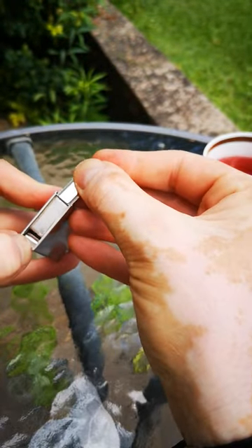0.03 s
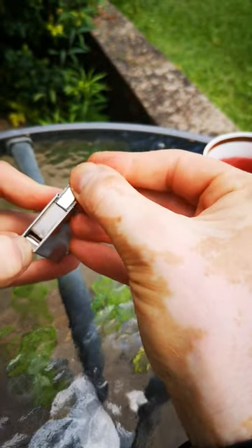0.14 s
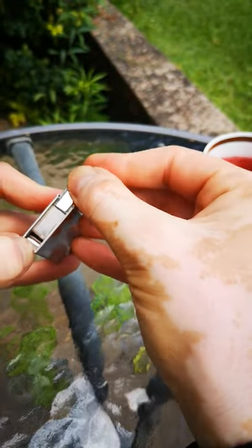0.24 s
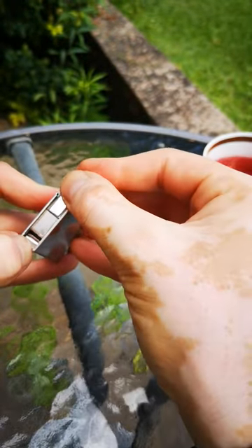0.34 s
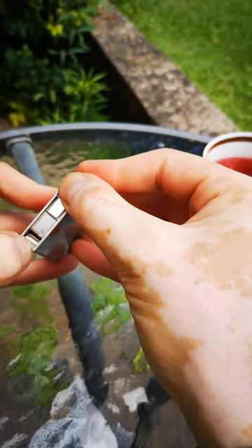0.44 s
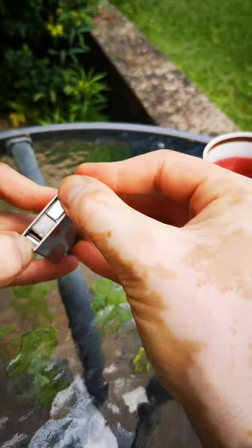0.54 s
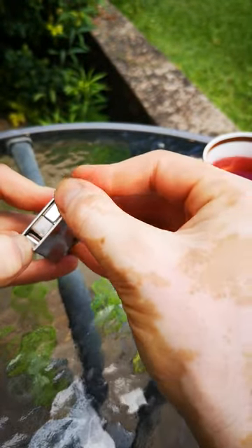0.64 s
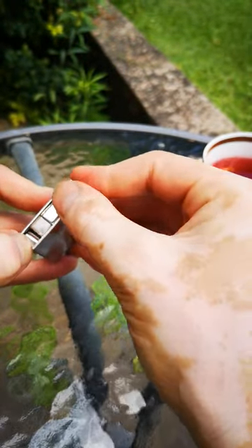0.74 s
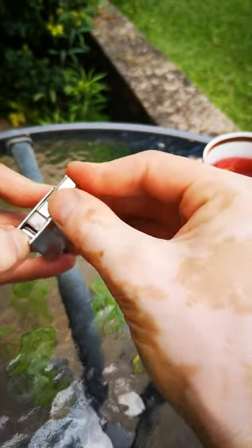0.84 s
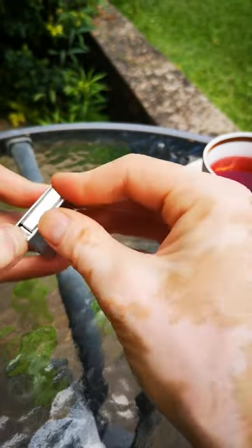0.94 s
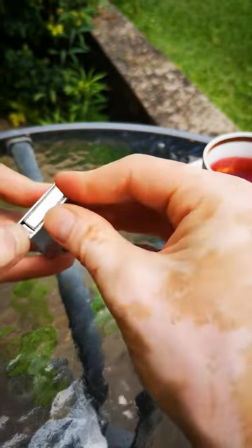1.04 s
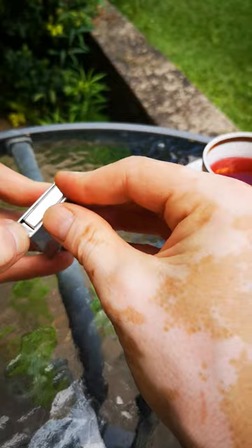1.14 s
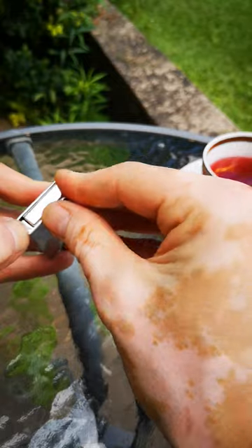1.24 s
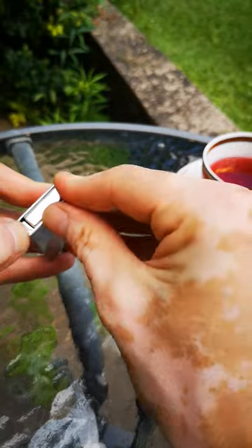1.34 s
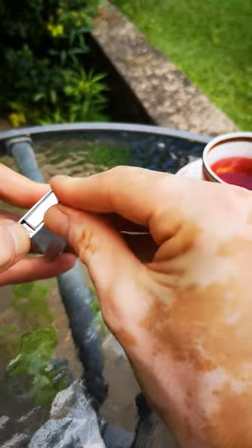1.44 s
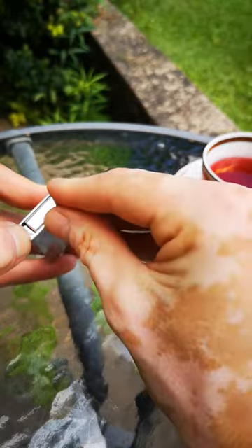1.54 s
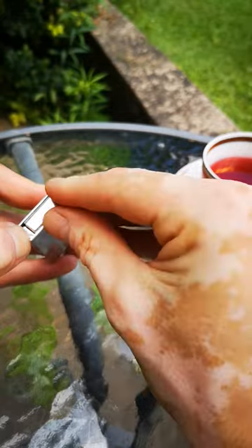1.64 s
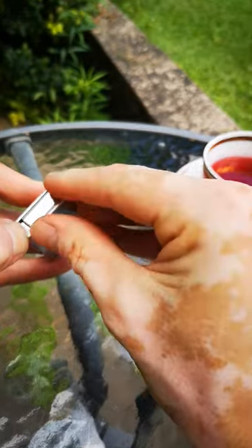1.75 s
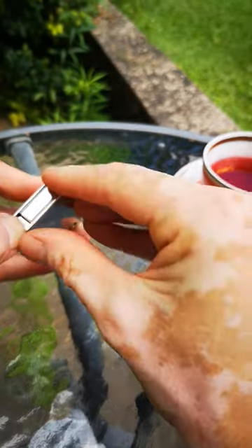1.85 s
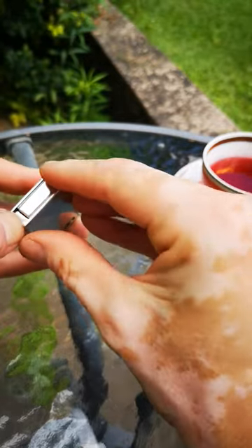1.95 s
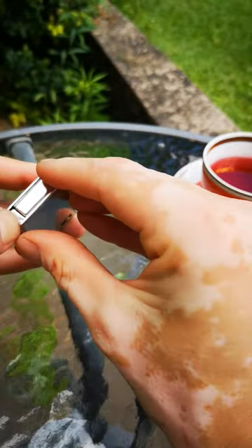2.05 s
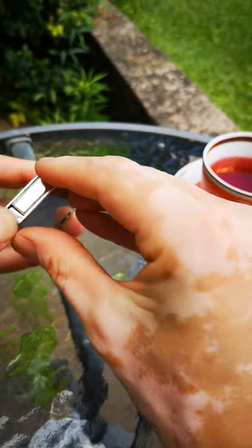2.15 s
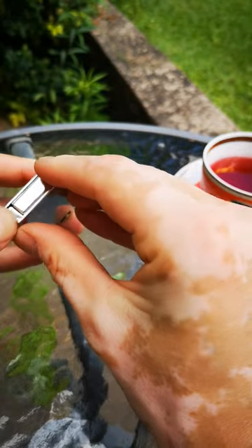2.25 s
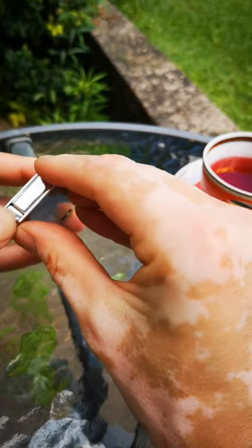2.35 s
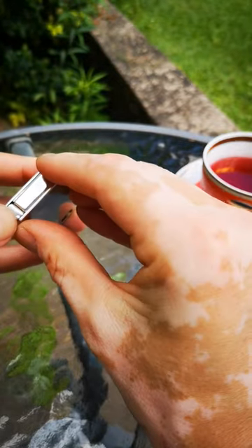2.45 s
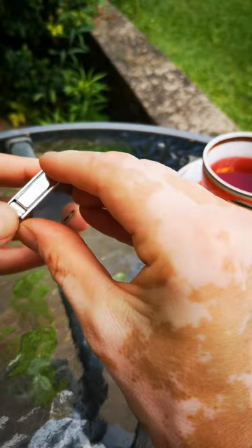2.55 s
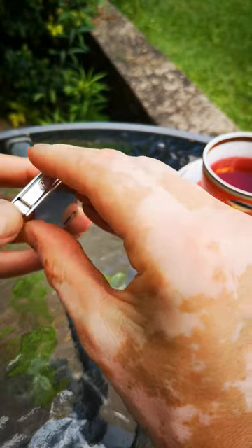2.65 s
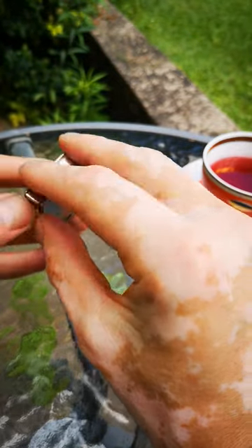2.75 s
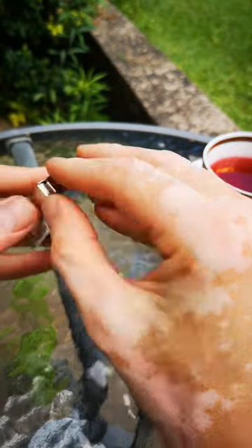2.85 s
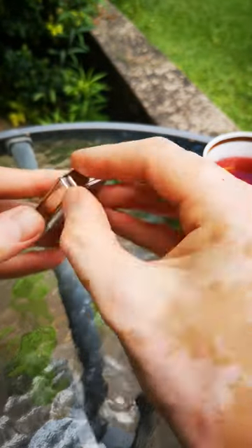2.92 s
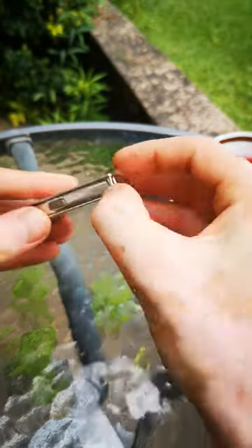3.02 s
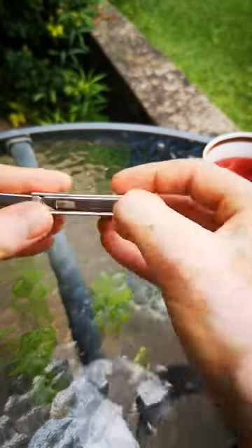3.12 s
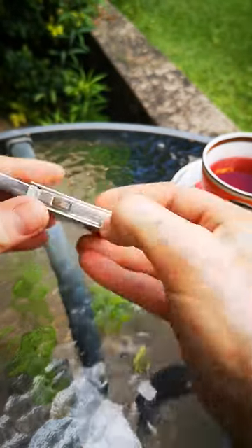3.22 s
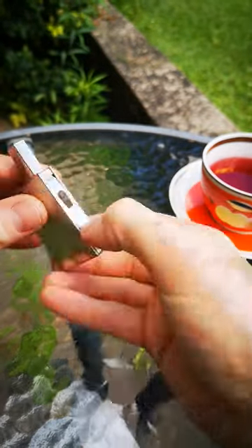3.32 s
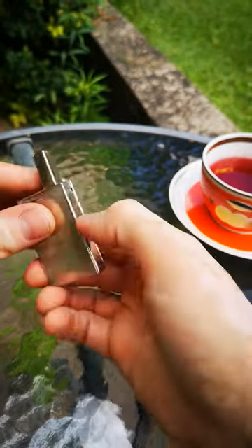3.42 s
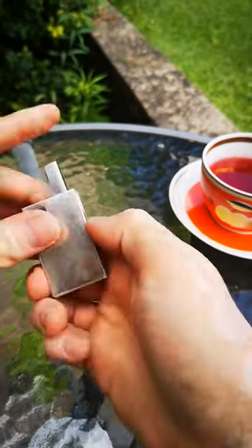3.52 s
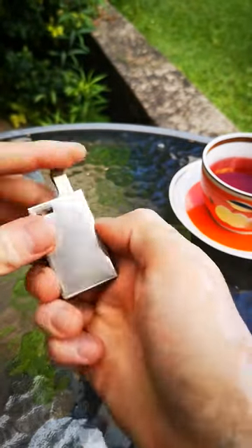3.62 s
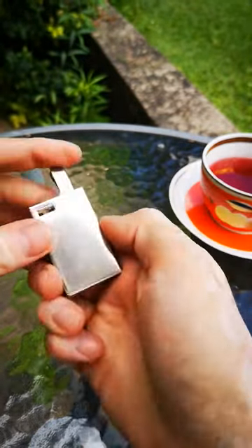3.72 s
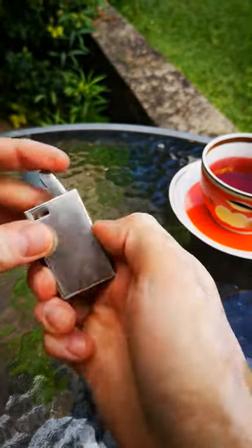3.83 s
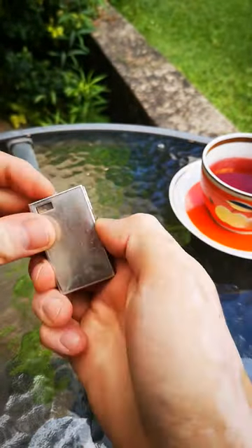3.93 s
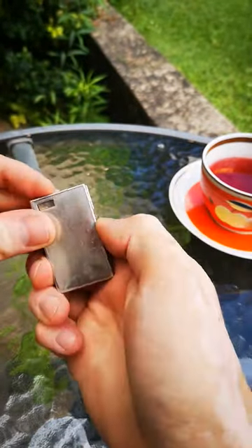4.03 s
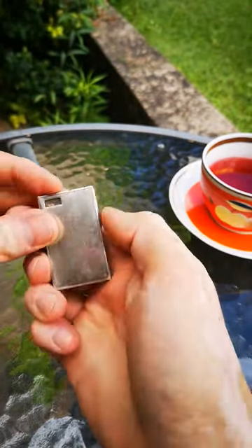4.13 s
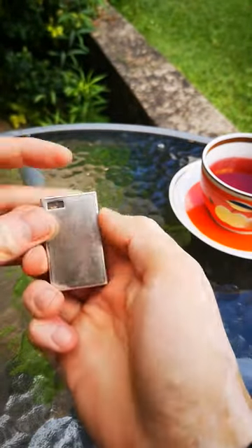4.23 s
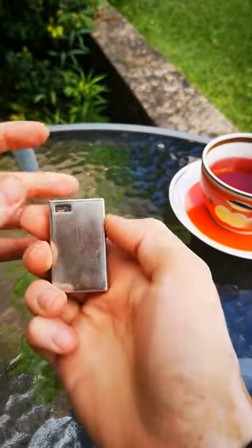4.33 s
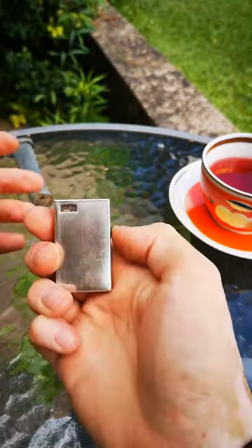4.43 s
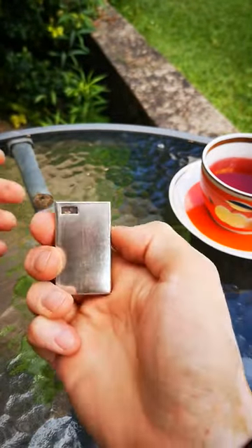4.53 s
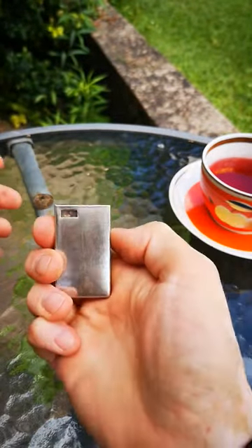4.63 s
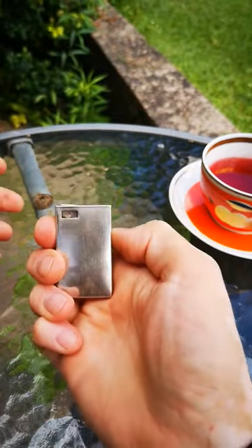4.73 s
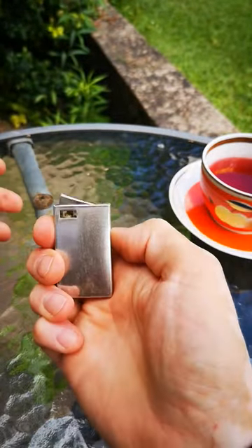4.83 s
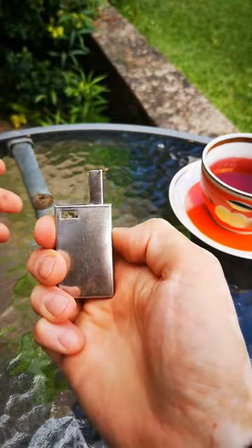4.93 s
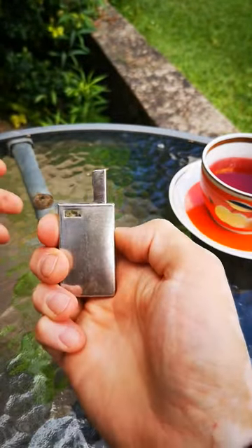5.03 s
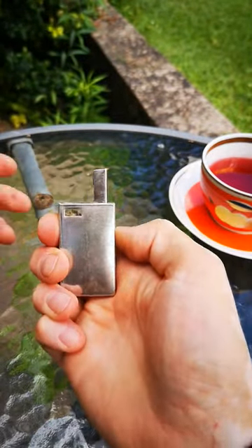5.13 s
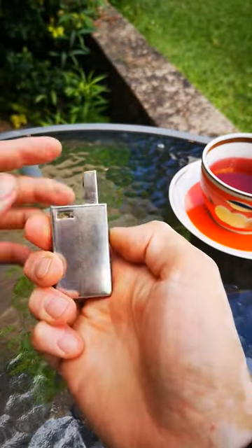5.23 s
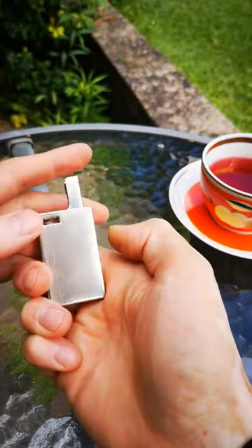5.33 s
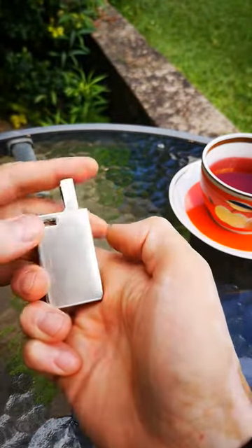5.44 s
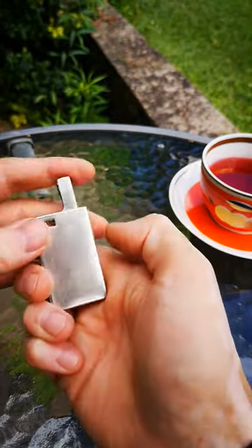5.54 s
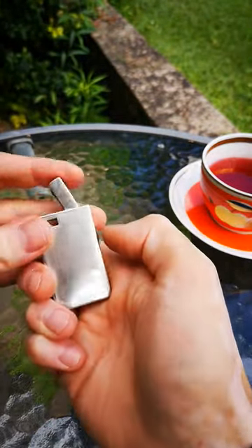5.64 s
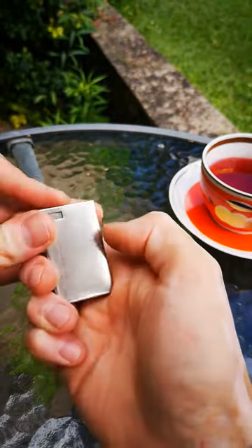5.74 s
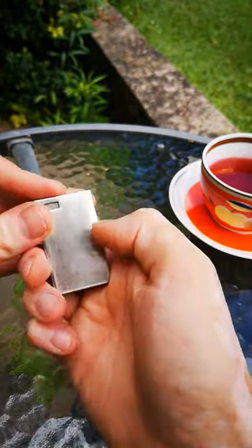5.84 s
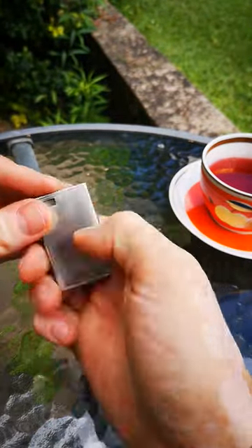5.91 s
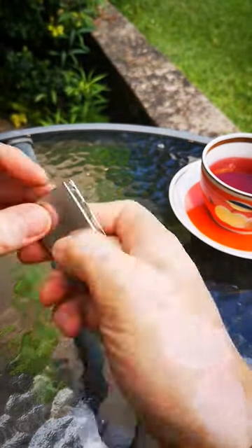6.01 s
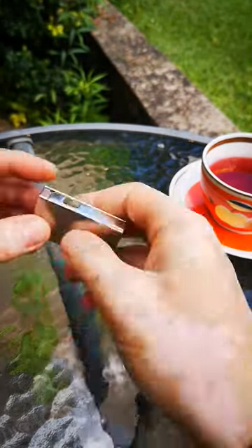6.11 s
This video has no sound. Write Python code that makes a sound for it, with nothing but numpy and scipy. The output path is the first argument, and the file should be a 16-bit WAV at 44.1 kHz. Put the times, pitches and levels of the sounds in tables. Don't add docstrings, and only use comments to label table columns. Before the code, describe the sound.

A quiet patio, heard close in stereo. Low, soft road rumble runs throughout, with a deep engine throb swelling and sinking irregularly and a faint drone later on. At 0.03 s a small metallic tick and brief scrape; a faint rub at 0.33. At 0.92 a sharp, bright snap of several contacts packed together, then a dull knock on ringing glass at 1.02 and a fainter touch at 1.13. Tiny finger ticks and a soft rub follow from 1.4 to 2.5. A far bird whistles upward around 3.2, with faint chips after. Light rattle at 3.35, a stronger scraping rattle at 3.54-3.59, then a hard snap at 3.88 and another click at 3.98, with a light glass touch. At 4.92 the loudest snap rings briefly. Small rattles at 5.26-5.43, a growing gritty push from 5.68 ending in a click at 5.76, and a soft glass tap at 6.14.

```python
import sys
import numpy as np
from scipy import signal
from scipy.fft import rfft, irfft, next_fast_len
from scipy.io import wavfile
from scipy.ndimage import uniform_filter1d, minimum_filter1d

SR = 44100
rng = np.random.default_rng(int(sys.argv[2]) if len(sys.argv) > 2 else 0)


def generate_wav(signal):
    frames = np.transpose(np.atleast_2d(signal))
    scaled = np.clip(frames, -1, 1) * 32767
    pcm = np.round(scaled).astype(np.int16)
    wavfile.write(sys.argv[1], SR, pcm)


def decibels_to_gain(level_db):
    exponent = np.asarray(level_db, float) / 20
    return 10 ** exponent


N = 272097


def rms_one(x):
    return x / np.sqrt(np.mean(x ** 2) + 1e-20)


def at_hz(points, hz):
    points = np.array(points)
    return np.interp(np.log(hz), np.log(points[:, 0]), points[:, 1])


def in_time(rows, outside=None):
    s, *columns = np.transpose(rows)
    t = np.arange(N) / SR
    return [np.interp(t, s, column, left=outside, right=outside) for column in columns]


def drift(rate):
    r = np.exp(-80 * np.pi * rate / SR)
    chance = rng.standard_normal(N // 40 + 2002)
    slow = signal.lfilter([1], [1, -2 * r, r * r], chance)[2000:]
    return np.interp(np.arange(N) / 40, np.arange(len(slow)), rms_one(slow))


def ring(clicks, hz, t60, phase=0):
    r = decibels_to_gain(-60 / (t60 * SR))
    w = 2 * np.pi * hz / SR
    start = [np.sin(phase), r * np.sin(w - phase)]
    return signal.lfilter(start, [1, -2 * r * np.cos(w), r * r], clicks + 1e-18)


def peak(x, hz, width_hz):
    r = np.exp(-np.pi * width_hz / SR)
    ends = np.array([1, 0, -1]) * (1 - r * r) / 2
    return signal.lfilter(ends, [1, -2 * r * np.cos(2 * np.pi * hz / SR), r * r], x)


def band(x, low_hz, high_hz):
    edges = [low_hz, min(high_hz, .45 * SR)]
    return signal.sosfilt(signal.butter(4, edges, "band", fs=SR, output="sos"), x)


def road_noise(white):
    # f/Hz, level per Hz/dB
    air = [(18, -8), (35, -3), (65, -8), (90, -15.5), (140, -22), (270, -24.5), (340, -33.5), (600, -37.5),
           (1050, -30), (1900, -39), (2900, -48), (4500, -55.5), (7500, -59), (15000, -73)]
    # f/Hz, likeness (1 = the same)
    likeness = [(60, 1), (130, 0.99), (290, 1), (600, 0.13), (1100, 0.067), (1800, 0.54), (3100, 0.031),
                (15000, .01)]
    # f/Hz, delay/ms
    late = [(60, 0.38), (350, 0.4), (700, 0.26), (1500, 0.53)]
    # t/s, level/dB
    road = [(0, -0.9), (1.1, -0.07), (1.5, -0.7), (1.9, -0.3), (2.6, -1.5), (3.2, 0.7), (3.8, 0.5),
            (4.5, 1), (4.9, 0.3), (5.25, 0.2), (5.65, 2.5), (6.17, -0.7)]
    out = 0
    edges = 18 * 2 ** (np.arange(30.5) / 3)
    together = drift(1.6)
    for k, (low, high) in enumerate(zip(edges, edges[1:])):
        third = signal.butter(2, [low, high], "band", fs=SR, output="sos")
        mid, side = signal.sosfilt(third, white[k % 2])[:, SR:]
        hz = np.sqrt(low * high)
        alike = np.clip(at_hz(likeness, hz), -1, 1)
        gain = decibels_to_gain(at_hz(air, hz) + .6 * together + .5 * drift(9))
        pair = np.sqrt(1 + alike) * mid + np.sqrt(1 - alike) * side * [[1], [-1]]
        pair[0] = np.roll(pair[0], round(at_hz(late, hz) * SR / 1000))
        out = out + gain * pair
    return decibels_to_gain(-48.0) * decibels_to_gain(in_time(road)[0]) * rms_one(out)


def engine_throb(white):
    # t/s, top level/dB, half length/s
    surges = [(0.0, -37, 0.057), (.22, -49, 0.028), (0.401, -37, 0.02), (0.588, -47.5, 0.039),
              (0.753, -44.5, 0.14), (1.001, -47.5, 0.22), (1.298, -40, 0.069), (1.479, -37.5, 0.032),
              (1.64, -39, 0.11), (1.872, -37, 0.045), (2.027, -38, .05), (2.313, -45, 0.21),
              (2.808, -34, 0.031), (3.02, -37.5, 0.054), (3.176, -43.5, 0.045), (3.419, -40.5, 0.089),
              (4.161, -43.5, 0.28), (4.418, -45, 0.076), (4.688, -40, 0.087), (4.856, -41.5, 0.034),
              (5.036, -47.5, .06), (5.288, -37.5, 0.053), (5.554, -35.5, 0.056), (5.897, -45.5, 0.12),
              (6.17, -38.5, 0.062)]
    t = np.arange(N) / SR
    surge = decibels_to_gain(-61.5) + sum(decibels_to_gain(db) * np.exp(-((t - s) / half) ** 2) for s, db, half in surges)
    throb = rms_one(peak(peak(white, 64, 4.9), 64, 4.9)[SR:])
    throb /= np.sqrt(uniform_filter1d(throb ** 2, size=SR // 8) + 0.29)
    return decibels_to_gain(-3.0) * surge * throb


def engine_drone(white):
    # t/s, low tone level/dB, high tone level/dB
    drone = [(0, -77.5, -79), (3.3, -74.5, -81.5), (4.1, -64.5, -68), (5.002, -66.5, -66.5),
             (6.17, -67, -67)]
    return sum(decibels_to_gain(level_db) * rms_one(peak(peak(white, hz, 6.9), hz, 6.9)[SR:])
               for hz, level_db in zip((173, 268), in_time(drone)))


def traffic():
    white = rng.standard_normal((2, 2, N + SR))
    return road_noise(white) + engine_throb(white[0, 0]) + engine_drone(white[1, 0])


def bird():
    # start t/s, end t/s, start f/Hz, end f/Hz, level/dB
    whistles = [
        (3.18, 3.31, 2000, 2620, -68),
        (3.28, 3.32, 5750, 5900, -80),
        (3.33, 3.45, 2600, 2400, -79),
        (3.45, 3.53, 5650, 5650, -81),
        (3.6, 3.66, 4900, 4550, -84),
        (3.67, 3.72, 4500, 4450, -85),
    ]
    out = np.zeros((2, N))
    t = np.arange(N) / SR
    for start, end, from_hz, to_hz, level_db in whistles:
        part = np.clip((t - start) / (end - start), 0, 1)
        turn = 2 * np.pi * np.cumsum(from_hz + (to_hz - from_hz) * part) / SR
        swell = np.sin(np.pi * part) ** 0.17
        out += decibels_to_gain(level_db) * swell * np.sin(turn + np.array([[0], [1.2]]))
    return out * decibels_to_gain(2.0 * drift(30))


def patio(x, level_db, near_t60, near_db, wall_s, wall_db):
    # f/Hz, level/dB
    echo_colour = [(1000, -8), (1800, -6), (2700, 7), (4500, -2), (7000, 2.5), (10000, -3), (15000, -11)]
    t = np.arange(int(.3 * SR)) / SR
    noise = rng.standard_normal((2, len(t)))
    top = band(noise, 8500, 19000)
    walls = (noise - top) * decibels_to_gain(-60 * t / .35) + top * decibels_to_gain(-60 * t / .32)
    slap = decibels_to_gain(wall_db) * np.exp(-((t - wall_s) / .008) ** 2)
    early = decibels_to_gain(near_db - 60 * t / near_t60) + slap
    echoes = (walls + noise * early) * (1 - np.exp(-t / .002))
    size = next_fast_len(N + len(t))
    colour = decibels_to_gain(at_hz(echo_colour, np.arange(size // 2 + 1) * SR / size + 1))
    return decibels_to_gain(level_db) * irfft(rfft(x, size) * rfft(echoes, size) * colour, size)[:, :N]


def table():
    # t/s, peak level/dB
    taps = [
        (1.017, -21.5),
        (1.133, -35.5),
        (4.024, -34),
        (6.144, -30.5),
    ]
    # f/Hz, level/dB, time to fall 60 dB/s
    pane = [(251.3, -10.5, 0.21), (392, -19, 0.14), (835, -18.5, 0.11), (1100, -13.5, 0.03),
            (1288, -12.5, 0.061), (1626, -13, 0.12), (1708, -15.5, 0.07), (2060, -11.5, 0.1),
            (2590, -23.5, 0.03), (2800, -17, 0.031)]
    # f/Hz, width/Hz, level/dB
    thump = [(267, 120, 7), (480, 83, -9), (1050, 250, -3.5), (1670, 300, 2), (2860, 1400, -5)]
    s, tap_db = np.transpose(taps)
    at = (s * SR).astype(int)
    out = np.zeros(N)
    for hz, level_db, t60 in pane:
        clicks = np.zeros(N)
        clicks[at] = decibels_to_gain(tap_db + level_db - 8 + rng.normal(0, 2.5, len(at)))
        out += ring(clicks, hz, t60)
    shock = np.zeros(N)
    fade = np.exp(-np.arange(1100) / (0.0076 * SR))
    bursts = rng.standard_normal((len(at), 1100)) * fade
    shock[at[:, None] + np.arange(1100)] = decibels_to_gain(tap_db - 1.5)[:, None] * bursts
    out += sum(decibels_to_gain(level_db) * peak(shock, hz, width_hz) for hz, width_hz, level_db in thump)
    out = band(band(out, 150, 2850), 100, 2950)
    return out * decibels_to_gain(np.array([[-.5], [.6]]))


def spring():
    # t/s, f/Hz, level/dB, time to fall 60 dB/s
    tones = [(4.917, 4165, -59, .5), (4.917, 3870, -45, .2), (4.917, 7050, -57, .33),
             (4.9162, 520, -29, .009), (4.921, 11800, -46, .07), (4.917, 3480, -49, .15),
             (4.917, 2650, -47, .15), (5.427, 3670, -67, .35), (3.578, 2830, -56, .25),
             (3.88, 2950, -44, .08), (3.983, 950, -31, .012), (1.018, 5100, -65, .1),
             (1.018, 3600, -61, .08), (3.352, 7000, -58, .06), (1.134, 300, -50, .12),
             (2.019, 4800, -58, .05), (0.032, 3200, -55, .03)]
    out = np.zeros(N)
    t = np.arange(SR // 2) / SR
    rise = 1 - np.exp(-t / .002)
    for start, hz, level_db, t60 in tones:
        tone = decibels_to_gain(level_db - 60 * t / t60) * rise * np.sin(2 * np.pi * hz * t)
        out[int(start * SR):][:len(t)] += tone
    return out


def contacts():
    # t/s, case level/dB, lid level/dB, edge level/dB
    snaps = [(0.0316, -36.5, -32, -35.5), (0.917, -30, -23.5, -17), (0.9187, -15.5, -19.5, -18.5),
             (0.9205, -8, -15, -13), (0.9224, -15.5, -11, -3.5), (0.9218, -21.5, -9.5, -2.5),
             (0.9257, -26, -19.5, -19), (3.8769, -8, -6, -14), (3.879, -8, -6, -14), (3.88, -9, -6, -6.5),
             (3.8822, -11.5, -21, -8.5), (3.8846, -10, -19, -24), (3.892, -23, -29, -36),
             (3.9726, -23.5, -29, -33.5), (3.9829, -8.5, -12.5, -11.5), (3.9858, -35.5, -27.5, -43),
             (4.9095, -26, -26.5, -34), (4.914, -22, -38, -36), (4.9159, -1, 1.7, -3),
             (4.9183, -6, -21, -22.5), (4.9217, -6, -3, -10.5), (4.926, -20.5, -25, -24.5),
             (4.931, -28.5, -33.5, -31), (5.747, -25.5, -47, -47.5), (5.752, -27, -25, -36),
             (5.7627, -4, -10, -14), (5.769, -27, -26.5, -36)]
    # t/s, case level/dB, brightness/dB
    touches = [(0.934, -40, 7), (3.349, -52, 7.5), (3.357, -42.5, 8.5), (3.5369, -33, 3.5),
               (3.544, -41, 11), (3.556, -32, 2.5), (3.566, -36, -3), (3.577, -29.5, -2.5),
               (3.583, -37.5, -10), (3.9226, -35.5, -10), (3.966, -26, -8), (3.979, -42, -21),
               (4.001, -38.5, -1), (5.2566, -30, -4.5), (5.276, -34, -8), (5.31, -41, -17),
               (5.333, -50, -17), (5.426, -29.5, -13.5), (5.702, -40, -6), (5.722, -51.5, -11),
               (5.737, -35, -1),
               (0.336, -55, -7), (1.403, -62.5, 4), (1.9, -63, 2), (2.019, -54, -3), (2.409, -54.5, -3),
             (2.435, -62.5, 7), (2.461, -62, 15), (2.467, -57.5, 11.5), (3.03, -57, -9), (3.33, -58, 5),
             (3.654, -66, -6), (3.682, -65, -1.5), (3.81, -53.5, -13.5), (4.442, -48.5, -8),
             (4.6005, -52.5, -19), (5.249, -49, -27.5), (5.346, -52.5, -16), (5.422, -39, -23)]
    soft = [(s, db, db + bright, db + 0.84 * bright - 12.5) for s, db, bright in touches]
    return np.transpose([*snaps, *soft])


def slides():
    # start t/s, end t/s, start level/dB, end level/dB, brightness/dB
    strokes = [
        (0.034, 0.04, -52, -67, 3.5),
        (0.331, .37, -65, -72, -1),
        (2.015, 2.057, -54, -70, -14),
        (3.343, 3.37, -56.5, -54.5, -0.5),
        (3.538, 3.591, -39.5, -49, -10.5),
        (3.962, 3.98, -45.5, -31.5, -14),
        (5.679, 5.76, -55, -27.5, -15),
    ]
    grit = rng.standard_normal(N) * (rng.random(N) < .2)
    pressure = 0
    for start, end, a_db, b_db, bright in strokes:
        rows = [(start, a_db, a_db + bright), (end, b_db, b_db + bright)]
        pressure = pressure + decibels_to_gain(in_time(rows, outside=-200))
    return grit * pressure


def struck(s, modes, hit_db, pan_db, trim_db, crack_db, scrape, low_hz, high_hz):
    at = (s[:, None] * SR).astype(int) + np.arange(220)
    fade = np.exp(-np.arange(220) / (0.00077 * SR))
    impacts = rng.standard_normal(at.shape) * (rng.random(at.shape) < .15) * fade
    impacts[:, 0] = 0.96
    impacts /= np.sqrt(np.sum(impacts ** 2, axis=1, keepdims=True))
    out = np.zeros((3, N))
    for hz, level_db, t60, side_db, lead in modes:
        strength_db = hit_db + trim_db + level_db + rng.normal(0, 1.8, len(at))
        for ear, sign in enumerate([1, -1]):
            force = scrape * decibels_to_gain(level_db + sign * side_db / 2)
            hit = decibels_to_gain(strength_db + sign * (side_db + pan_db) / 2)
            np.add.at(force, at, impacts * hit[:, None])
            out[ear] += ring(force, hz, min(t60, .012), ear * lead)
    crack = rng.standard_normal(at.shape) * fade * decibels_to_gain(hit_db + crack_db)[:, None]
    np.add.at(out[2], at, crack)
    return band(out, low_hz, high_hz)


def lighter():
    # f/Hz, level/dB, time to fall 60 dB/s, left over right/dB, right phase lead/rad
    case_modes = [(1770, -11.5, 0.015, -1.5, -2.2), (2035, -7, 0.011, -3, -0.94),
                  (2530, -6, 0.0076, -1, -1.6), (2664, 0, 0.035, -0.5, -1.3),
                  (2900, -10, 0.036, -9.5, -2.3), (3567, -7, 0.035, 1, -0.2)]
    lid_modes = [(4930, -11, 0.0044, 1.7, 0.5), (5460, -12, 0.03, 12, 4.5), (5827, -9, 0.02, 3, 1.27),
                 (6550, -3.5, 0.0091, 1.7, -2), (6856, -1.5, 0.005, 2.3, -0.5), (7430, -8, 0.0041, 17, 7)]
    edge_modes = [(8850, -2.5, .006, 6, -1.4), (9950, -4, .006, 8, 1.5), (10850, -8, .006, 7, -1.2),
                  (11800, -13, .005, 6, 1.1), (13000, -18, .005, 4, 1.6), (14500, -18, .005, 3, -1.3)]
    # t/s, left over right/dB, cupped-palm boost/dB, freedom of the side wall/dB
    grip = [(0.03, -12, -4.5, -12), (0.4, -5.5, 2, 0), (0.92, 2, -2.5, 1.5), (2.3, -7.5, 2, 1.2),
            (3.35, 1, 7, 13.5), (3.55, -10, 8.5, 3.3), (3.88, -1, 5, 6), (3.98, -4.5, 6.5, 11),
            (4.92, -5.5, -6.5, 5), (5.27, -7.5, 9, -1.5), (5.43, 1.3, 2.5, -11.5), (5.74, -9, 9, 2.7),
            (5.763, 1.5, 10, 9)]
    s, case_db, lid_db, edge_db = contacts()
    held_db, palm_db, wall_db = in_time(grip)
    pan_db = held_db[(s * SR).astype(int)]
    low, high = slides()
    case = struck(s, case_modes, case_db, .3 * pan_db, trim_db=-7.5, crack_db=0.0,
                  scrape=decibels_to_gain(-17) * low, low_hz=1400, high_hz=4510)
    case[:2] += decibels_to_gain(np.array([[3.0], [9.0]])) * peak(low, 2820, 140)
    case[1] += (decibels_to_gain(palm_db) - 1) * peak(case[1], 2700, 420)
    case[:2] += (decibels_to_gain(wall_db) - 1) * peak(case[:2], 1620, 260)
    lid = struck(s, lid_modes, lid_db, pan_db, trim_db=-4, crack_db=-1.5,
                 scrape=decibels_to_gain(-13.0) * high, low_hz=4300, high_hz=8100)
    edge = struck(s, edge_modes, edge_db, pan_db, trim_db=-5.0, crack_db=-4,
                  scrape=decibels_to_gain(-19.5) * high, low_hz=8040, high_hz=15300)
    out = case + lid + edge
    steep = signal.sosfilt(signal.butter(6, 1300, "high", fs=SR, output="sos"), out)
    bass = signal.sosfilt(signal.butter(1, 500, "low", fs=SR, output="sos"), out)
    return steep + decibels_to_gain(-35) * bass


def scene():
    left, right, crack = lighter()
    taps = table()
    near = np.array([left, right]) + taps + spring()
    thrown = crack + .1 * (left + right) + 1.5 * taps[0]
    echoes = patio(thrown, level_db=-54.5, near_t60=.08, near_db=5.5, wall_s=.078, wall_db=-19)
    return near + echoes + bird() + traffic()


def roll_off(x):
    return signal.sosfilt(signal.butter(12, 16550, fs=SR, output="sos"), x)


def record(dry):
    limit = .93
    heard = dry + decibels_to_gain(-85) * rng.standard_normal(dry.shape)
    heard = signal.sosfilt(signal.butter(8, 15900, "low", fs=SR, output="sos"), heard)
    duck = limit / np.maximum(np.abs(heard).max(axis=0), limit)
    heard = heard * uniform_filter1d(minimum_filter1d(duck, size=41), size=21)
    return roll_off(heard)


dry = scene()
out = record(dry)
generate_wav(out)
```